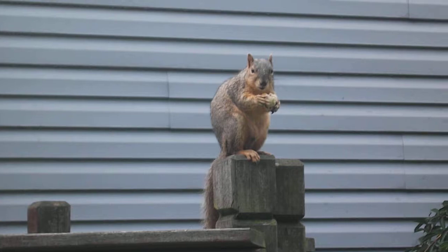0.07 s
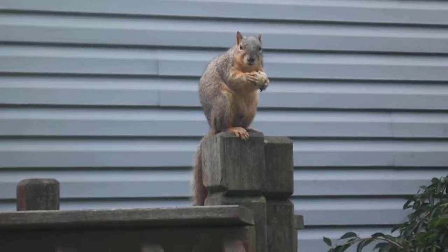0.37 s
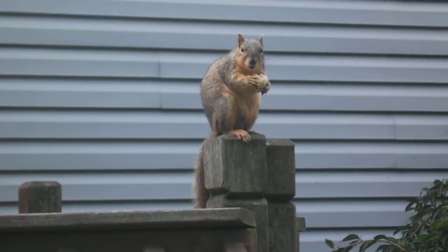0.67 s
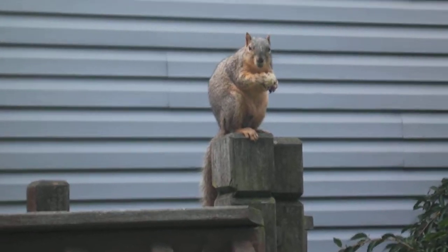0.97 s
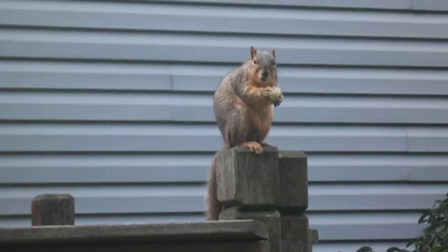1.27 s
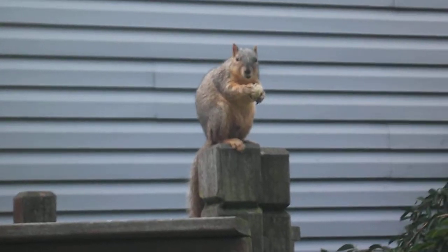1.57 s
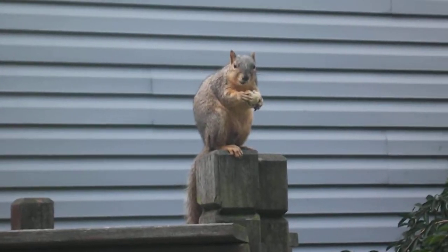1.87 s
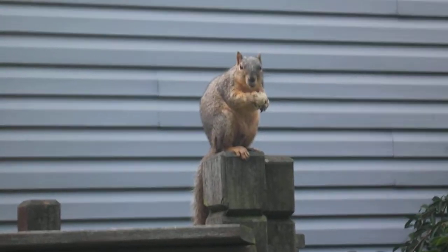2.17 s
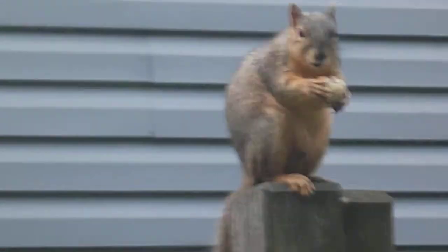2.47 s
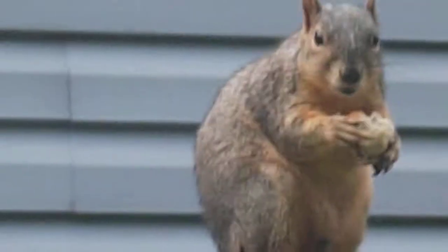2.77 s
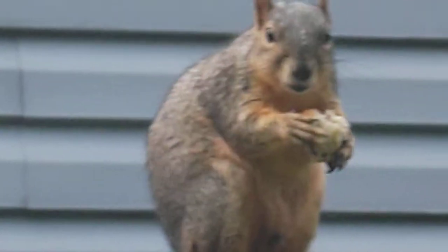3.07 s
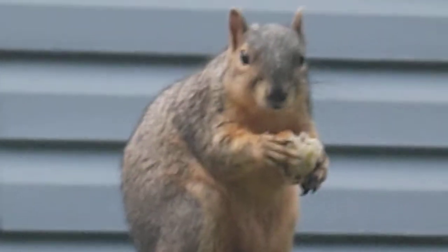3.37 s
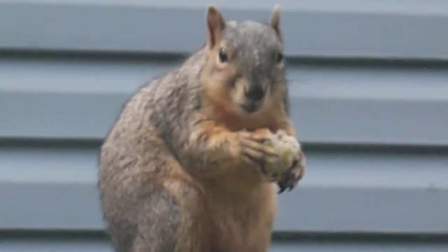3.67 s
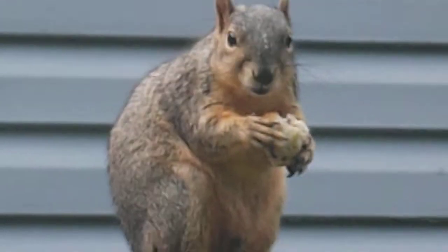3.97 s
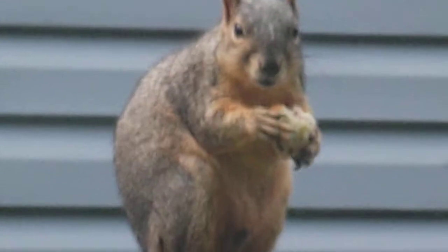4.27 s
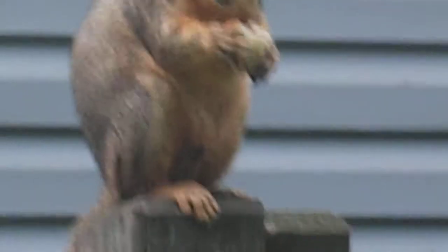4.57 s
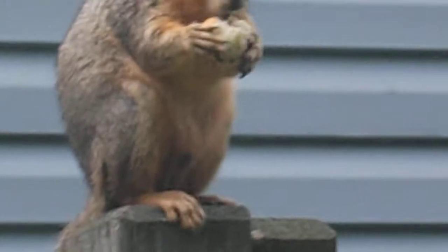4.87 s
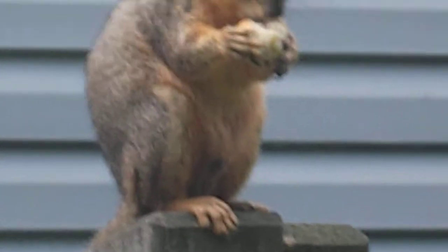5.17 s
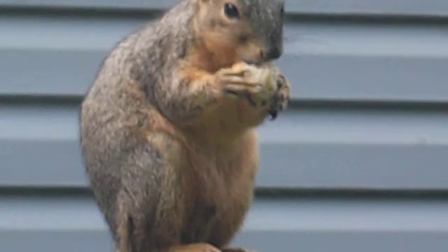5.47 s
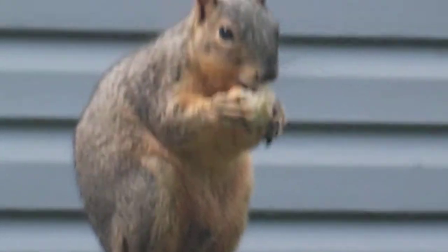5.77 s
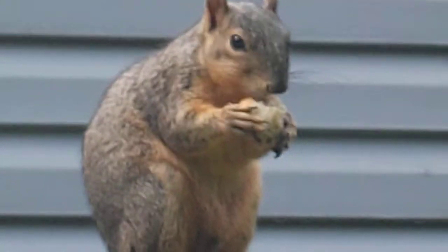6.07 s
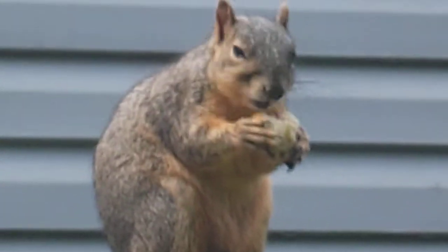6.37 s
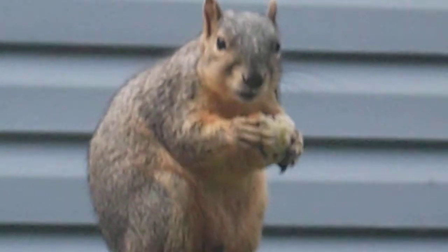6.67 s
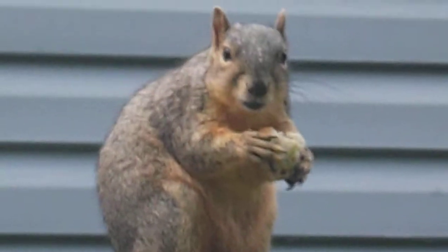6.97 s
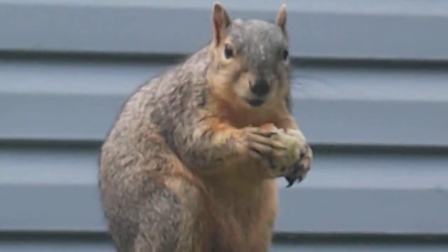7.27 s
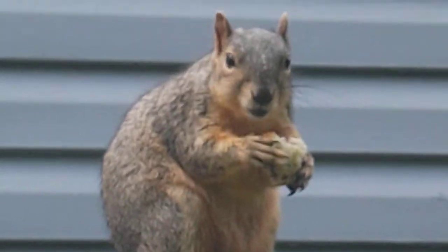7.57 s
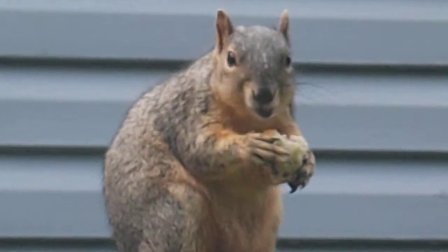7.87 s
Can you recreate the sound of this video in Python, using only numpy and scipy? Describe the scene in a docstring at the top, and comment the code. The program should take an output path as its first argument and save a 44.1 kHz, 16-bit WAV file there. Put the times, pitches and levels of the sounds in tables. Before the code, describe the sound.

Irregular plastic clicks and snaps of a handled camera over low distant traffic rumble, with faint insect chirps and a far bird.

```python
"""Hand-held camera in a quiet yard

The plastic case clicks, creaks and rubs under the fingers: damped modes and grainy friction noise.
The hardest snaps overload the microphone. An insect chirps high and faint; a far bird calls four times.
A distant engine hums and fades over the traffic rumble."""
import sys
import numpy as np
from scipy import signal
from scipy.fft import rfft, irfft, next_fast_len
from scipy.io import wavfile
from scipy.ndimage import map_coordinates

SR = 44100
rng = np.random.default_rng(int(sys.argv[2]) if len(sys.argv) > 2 else 0)


def transcribe(signal):
    """Save signal, clipped to [-1, 1], as a 16-bit WAV file at the path in sys.argv[1]."""
    frames = np.atleast_2d(signal).T
    limited = np.clip(frames, -1, 1)
    pcm = np.round(limited * 32767).astype(np.int16)
    wavfile.write(sys.argv[1], SR, pcm)


N = 357651


def clicks(after_db=-28, muting_grip_db=-52, muting_knock_db=-7):
    """The case gives under the grip: wall ring near 2 kHz, thud, knock, snap and faint after-ring."""
    # t/s, level/dB, wall f/Hz, thud/dB, knock/dB, snap/dB, treble edge/Hz; parts relative to level
    blows = [(0.1224, -17.5, 1900, 8.5, 12.5, -7.5, 10400), (0.177, -31, 1960, 11.5, 0, -3, 11000),
             (0.398, -34, 1860, -20, -28, -11, 6000), (0.5307, -17.5, 1880, -34, -25, 0.5, 7540),
             (1.5890, -34, 2080, -16, -23, -4, 7000), (1.6170, -34, 1750, -20, -10, -17, 5000),
             (1.6320, -14, 1900, -30, -9, 4.5, 5060), (2.4723, -13.5, 1960, -21, -15, 0.5, 10100),
             (2.5126, -34.5, 1870, -20, -20, -6, 6000), (2.562, -28.5, 1920, 0, 15, 1, 2800),
             (3.2120, -44, 1810, -18, -20, 8, 7000), (3.3140, -28, 1900, -25, -17, -6, 5000),
             (3.3863, -13, 1950, -29, -7, -4.5, 5000), (3.9466, -1, 2007, -13, -15, 2, 6800),
             (4.0731, -25.5, 1960, -28, -28, -5, 6000), (4.1750, -7, 2000, -7, -13, 1.5, 9900),
             (4.177, 3.5, 2050, -34, -13, 6, 9200), (4.1783, 1, 1750, -24, -12, 7, 9200),
             (4.2452, -9.5, 1900, -36, 7, 0, 6000), (4.5516, -10, 1850, -32, -24, -6.5, 5600),
             (7.9770, -24, 1830, -21, -18, -5, 9000)]
    # case modes: f/Hz, level/dB, t60/s
    thud_modes = [(151, 1, 0.012), (450, -2, .007)]
    knock_modes = [(760, -14.8, 0.021), (970, -11.5, 0.012), (1264, -8.5, 0.01)]
    after_modes = [(1560, 3.5, 0.11), (1750, -14.5, .25), (2120, -7.5, 0.13), (2580, -7, 0.12),
                   (3170, -19.5, 0.16)]
    # thin dry ticks: t/s, level/dB
    ticks = [(4.3361, -29)]
    out, t = np.zeros(N), np.arange(SR // 4) / SR
    for at_s, db, hz, thud_db, knock_db, snap_db, edge_hz in blows:
        body = amp(thud_db) * ring(thud_modes, t) + amp(knock_db) * ring(knock_modes, t)
        # the fingers mute the after-ring
        muting = 1 + finger_pressure(at_s) / amp(muting_grip_db) + amp(knock_db - muting_knock_db)
        after = amp(after_db) * ring(after_modes, t) / muting
        click = wall(hz, t) + body + amp(snap_db) * snap(t) + after
        add(out, at_s, amp(db) * softened(click, edge_hz))
    for at_s, db in ticks:
        add(out, at_s, amp(db - 60 * t / 0.00091) * np.cos(2 * np.pi * 7500 * t))
    return out


def wall(hz, t, attack_s=0.00023):
    """Main ring of the case; its pitch depends on where the fingers hold it."""
    # close wall modes: ratio to hz, level/dB, t60/s
    modes = [(.87, -10, .012), (1, 0.5, .015), (1.16, -11, 0.015)]
    tone = sum(amp(db - 60 * t / t60) * np.sin(2 * np.pi * ratio * hz * t) for ratio, db, t60 in modes)
    return -tone * (1 - np.exp(-t / attack_s))


def snap(t, crack_db=-10, crack_t60_s=0.011):
    """Bright modes, slightly detuned by the grip, and a crack of noise."""
    # bright case modes: f/Hz, relative level/dB, t60/s
    modes = [(2540, -0.5, 0.005), (3280, -2, 0.0059), (4000, -6.5, 0.0089), (5950, -7, 0.0037),
             (6420, -8.5, 0.0093), (7660, -7, 0.0062), (10150, -10, 0.0064)]
    crack = amp(crack_db - 60 * t / crack_t60_s) * rng.standard_normal(len(t))
    detune = rng.uniform(.96, 1.04)
    return amp(-4.5) * ring(modes, detune * t) + crack


def ring(modes, t):
    """Damped modes; each blow lands elsewhere and shifts their strengths."""
    shift_db = rng.normal(0, 1.5, len(modes))
    return sum((-1) ** k * amp(db + shift_db[k] - 60 * t / t60) * np.sin(2 * np.pi * hz * t)
               for k, (hz, db, t60) in enumerate(modes))


def softened(x, edge_hz):
    """A softer contact carries less treble."""
    return signal.lfilter(*signal.butter(3, edge_hz, fs=SR), x)


def creak(start_s=4.184, length_s=.055, start_rate_hz=250, end_rate_hz=350, level_db=-26, fall_db=8):
    """A seam sticks and slips after the hardest snap: tiny blows, ever quicker and weaker."""
    out, t = np.zeros(N), np.arange(SR // 40) / SR
    progress = np.linspace(0, 1, int(length_s * SR))
    rate_hz = np.interp(progress, [0, 1], [start_rate_hz, end_rate_hz])
    slip_count = np.floor(np.cumsum(rate_hz) / SR)
    slip = softened(wall(hz=1985, t=t) + amp(-1.5) * snap(t), edge_hz=9500)
    for u in progress[np.diff(slip_count, prepend=-1) > 0]:
        add(out, start_s + u * length_s, amp(level_db - fall_db * u ** 2) * slip)
    return out


def rubs():
    """Skin catches and slips on plastic: dense uneven grains, coloured by the case."""
    # rub spectrum: f/Hz, relative level/dB
    spectrum = [(60, -42.5), (300, -13.5), (1300, -14.5), (1700, -4.5), (1980, 3.6), (2300, -7),
                (3400, -12), (4400, -9), (5100, -23), (6200, -15.5), (8200, -16.5), (10800, -24),
                (14000, -46.5)]
    grains = rng.standard_normal(N) * amp(1.6 * wobble(500))
    return finger_pressure(np.arange(N) / SR) * coloured(grains, spectrum)


def finger_pressure(t):
    """Each finger slide swells and lets go."""
    # slides: centre t/s, length/s, level/dB
    slides = [(0.36, 0.05, -45), (.891, 0.0089, -47), (1.111, 0.023, -48.5), (1.28, 0.15, -49),
              (1.361, 0.025, -41.5), (1.45, 0.048, -45.5), (2.095, 0.029, -49), (2.474, 0.043, -49),
              (4.08, 0.019, -41), (4.193, 0.05, -36)]
    return sum(amp(db) * np.exp(-(2 * (t - at_s) / length_s) ** 2) for at_s, length_s, db in slides)


def insect(pitch_hz=7850, arch_hz=220, stroke_hz=92, chirp_s=.105, level_db=-56):
    """Each chirp is a swelling run of wing strokes with a slightly arching pitch."""
    # chirp ends, just under two a second: t/s
    ends_s = [.602, 1.426, 1.944, 2.555, 3.085, 3.632, 4.212, 4.803, 5.392, 5.967, 6.645, 7.363]
    out, t = np.zeros(N), np.arange(int(chirp_s * SR)) / SR
    progress = t / chirp_s
    stroke = (stroke_hz * (t - chirp_s)) % 1
    hz = pitch_hz + arch_hz * (np.sin(np.pi * progress ** 2.4) - .7) - 150 * (stroke - .5)
    swell = np.interp(progress, [0, .45, .95, 1], [.15, .84, .83, .42])
    pulses = np.abs(np.sin(np.pi * stroke)) ** 1.7
    for end_s in ends_s:
        jitter_hz = 500 * rng.standard_normal(len(t))
        add(out, end_s - chirp_s, amp(level_db) * swell * pulses * np.sin(phase_of(hz + jitter_hz)))
    return out


def bird(fall_ratio=0.64, blur_hz=800):
    """Falling calls, blurred into narrow noise by distance and walls."""
    # calls: t/s, length/s, start f/Hz, level/dB
    calls = [(1.149, 0.097, 3200, -60), (1.557, 0.19, 3320, -50.5), (2.975, 0.12, 3950, -60),
             (4.802, 0.18, 4250, -63)]
    out = np.zeros(N)
    for at_s, length_s, start_hz, db in calls:
        progress = np.linspace(0, 1, int(length_s * SR))
        tone = np.sin(phase_of(start_hz * fall_ratio ** progress))
        add(out, at_s, amp(db) * np.sin(np.pi * progress) * tone)
    return out * unit(wobble(blur_hz))


def engine(firing_hz=76.7, waver_hz=.39, sag_from_s=3.38, sag_hz_per_s=.8, flutter_db=1, octave_db=-26):
    """Far engine: a wavering firing tone and weak octave, slowing a little and dying away."""
    # hum envelope: t/s, level/dB
    envelope = [(0.04, -36), (1.23, -31.5), (1.46, -45), (1.6, -36), (2.54, -38), (2.61, -48), (2.88, -36),
                (3.24, -53), (3.37, -32), (3.89, -40.5), (3.93, -57), (4.01, -37), (4.63, -47),
                (4.74, -37.5), (5.89, -43.5), (6.17, -49), (6.21, -45), (6.5, -51)]
    t = np.arange(N) / SR
    hz = firing_hz - sag_hz_per_s * np.maximum(t - sag_from_s, 0) + waver_hz * wobble(7.21)
    phase = phase_of(hz)
    hum = np.sqrt(2) * (np.sin(phase) + amp(octave_db) * np.sin(2 * phase))
    level_db = np.interp(t, *np.transpose(envelope)) + flutter_db * wobble(9.7)
    fade = np.interp(t, [5.85, 6.9], [1, 0])
    return amp(level_db) * fade * hum


def traffic(rise_db_per_s=0.3, swell_db=1.95, drone_hz=101.3):
    """Distant traffic: slowly growing rumble, steady air and a faint wavering drone."""
    # outdoor noise spectra: f/Hz, relative level/dB
    rumble_spectrum = [(8, -3.5), (22, 0.5), (37, -4), (47, -5), (62, -5), (85, -12.5), (130, -37),
                       (300, -81)]
    air_spectrum = [(50, -32), (85, -2), (140, -11.5), (162, -12.5), (242, -18), (281, -17), (349, -20.5),
                    (478, -22.5), (546, -22), (613, -24.5), (899, -23.5), (1250, -29.5), (2690, -32.5),
                    (3390, -42), (4500, -48.5), (5850, -65.5), (9900, -120)]
    t = np.arange(N) / SR
    rumble_db = -40 + rise_db_per_s * t + swell_db * wobble(3.82)
    rumble = amp(rumble_db) * coloured(rng.standard_normal(N), rumble_spectrum)
    air = amp(-45 + 0.47 * wobble(3)) * coloured(rng.standard_normal(N), air_spectrum)
    drone = amp(-53.5 + 2.2 * wobble(3.6)) * np.sin(phase_of(drone_hz + 1.54 * wobble(4.9)))
    return rumble + air + drone


def amp(db):
    """Decibels to gain."""
    return 10 ** (np.asarray(db) / 20)


def unit(x):
    """Scale to rms 1."""
    return x / np.sqrt(np.mean(x ** 2) + 1e-20)


def phase_of(hz):
    """Running phase/rad of a frequency curve."""
    return 2 * np.pi * np.cumsum(hz) / SR


def wobble(rate_hz):
    """Smooth random curve through rate_hz knots a second."""
    knots = rng.standard_normal(int(N * rate_hz / SR) + 4)
    return map_coordinates(knots, [np.arange(N) * rate_hz / SR])


def filtered(x, response):
    """Apply the gain response(hz) by FFT."""
    size = next_fast_len(N + 8192)
    return irfft(rfft(x, size) * response(np.fft.rfftfreq(size, 1 / SR)), size)[:N]


def coloured(x, spectrum):
    """Shape x by (f/Hz, level/dB) points, at rms 1."""
    points_hz, db = np.transpose(spectrum)
    return unit(filtered(x, lambda hz: amp(np.interp(np.log(hz + 1), np.log(points_hz + 1), db))))


def add(track, at_s, sound):
    """Mix a short sound into the track."""
    part = track[max(round(at_s * SR), 0):][:len(sound)]
    part += sound[:len(part)]


def scene():
    """Handling noise over the yard, mono."""
    return (clicks() + creak() + rubs() + insect() + bird() + engine() + traffic())[None]


def record(dry, start_s=.035, whine_hz=10715, top_hz=15800):
    """The camera adds hiss and a thin whine, clips at full scale and limits the band."""
    # microphone hiss: f/Hz, relative level/dB
    hiss_spectrum = [(2000, -16), (4200, -7), (5600, -7), (6300, -4.5), (7000, -6), (9300, -8), (10500, -4),
                     (11300, -0.5), (12200, -9), (13300, -12), (15700, -14.5)]
    t = np.arange(N) / SR
    hiss = amp(-60.5) * coloured(rng.standard_normal(N), hiss_spectrum)
    whine = amp(-73.5) * np.sin(2 * np.pi * whine_hz * t)
    fade_in = np.clip((t - start_s) / .004, 0, 1)
    clipped = fade_in * np.clip(dry[0] + hiss + whine, -1, 1)
    return filtered(clipped, lambda hz: 1 / (1 + (hz / top_hz) ** 150))[None]


dry = scene()
out = record(dry)
transcribe(out)
```